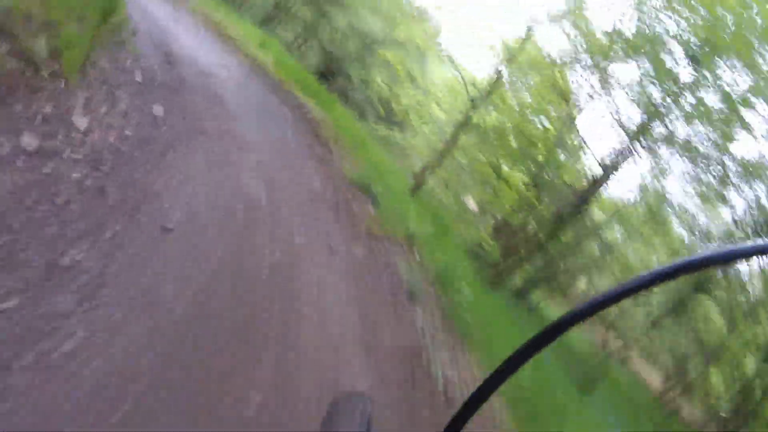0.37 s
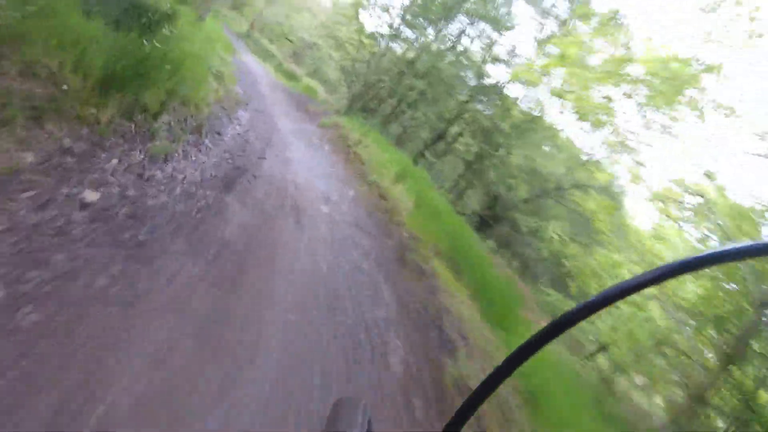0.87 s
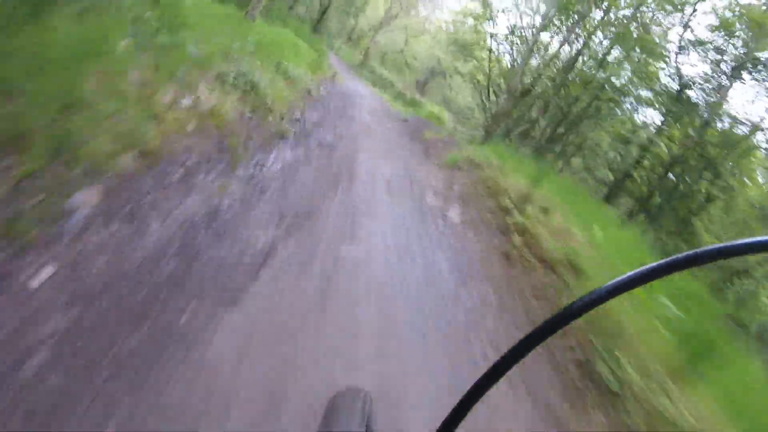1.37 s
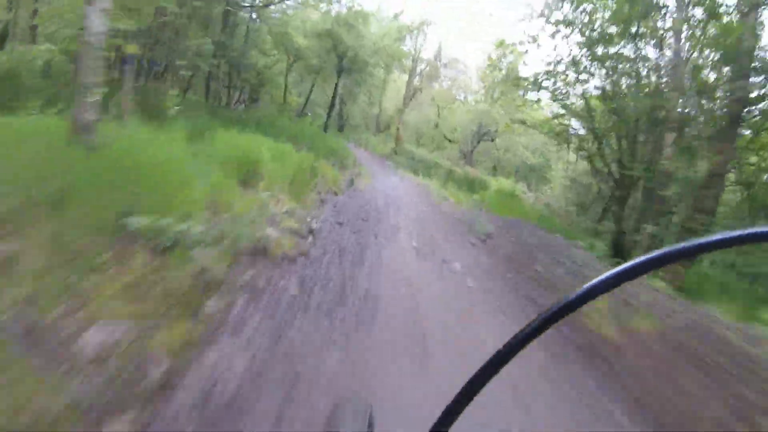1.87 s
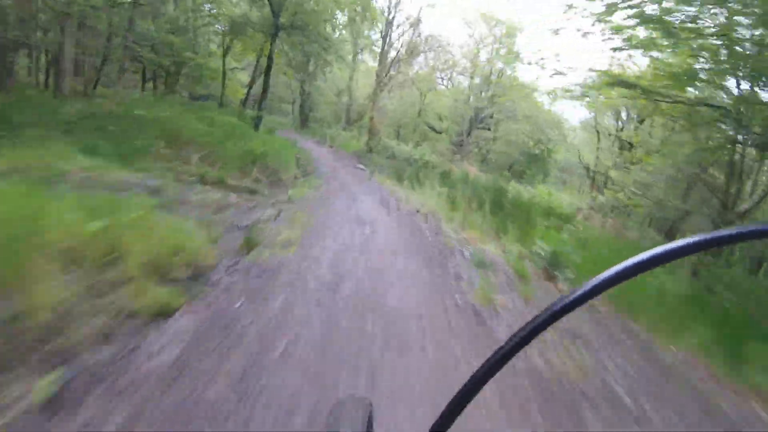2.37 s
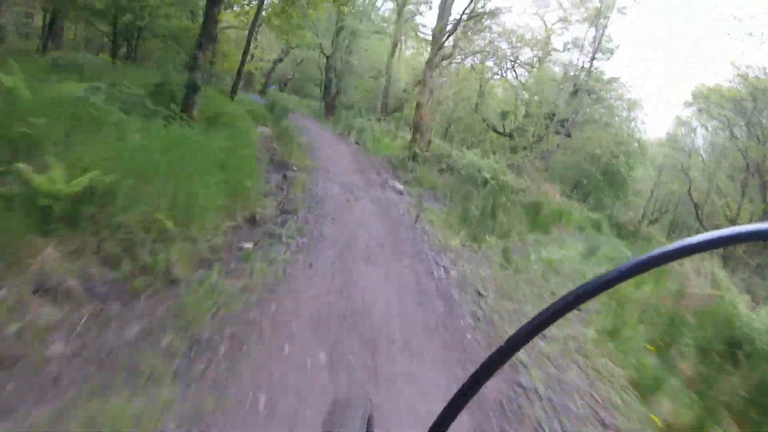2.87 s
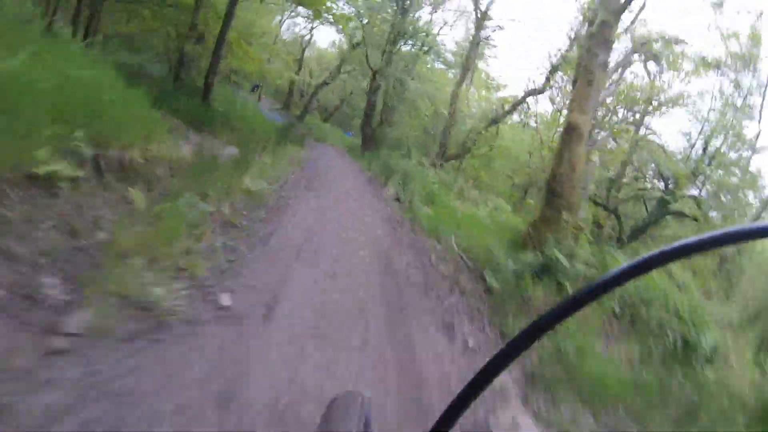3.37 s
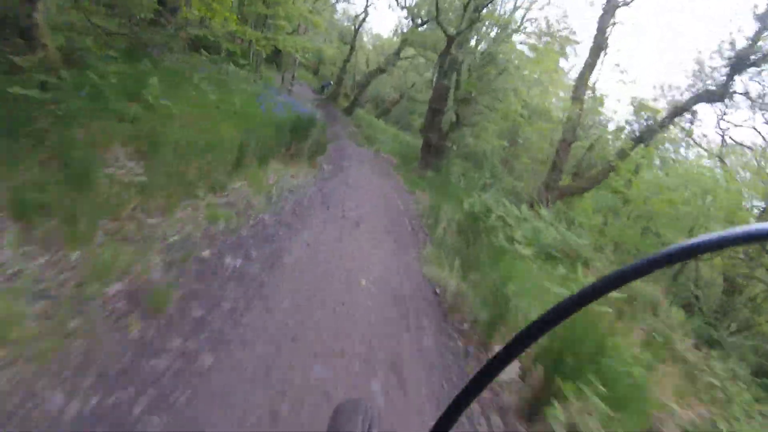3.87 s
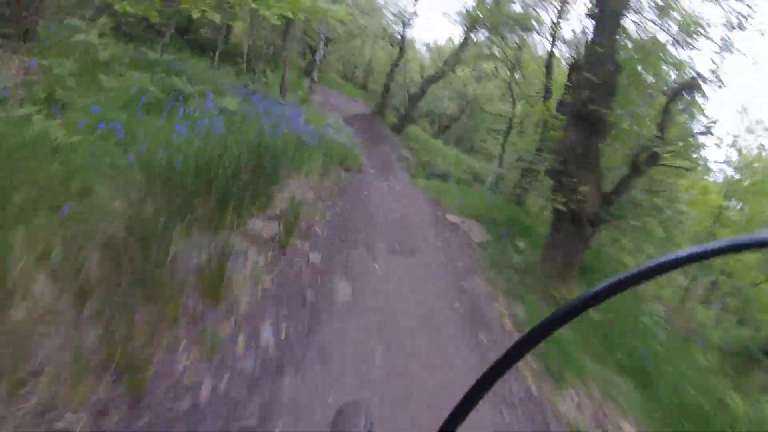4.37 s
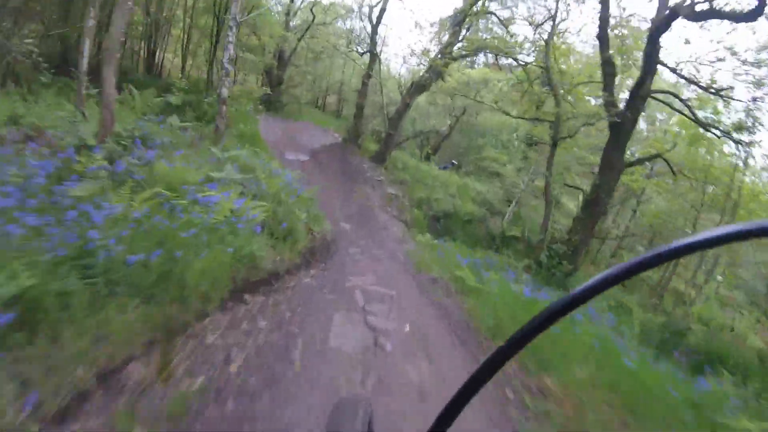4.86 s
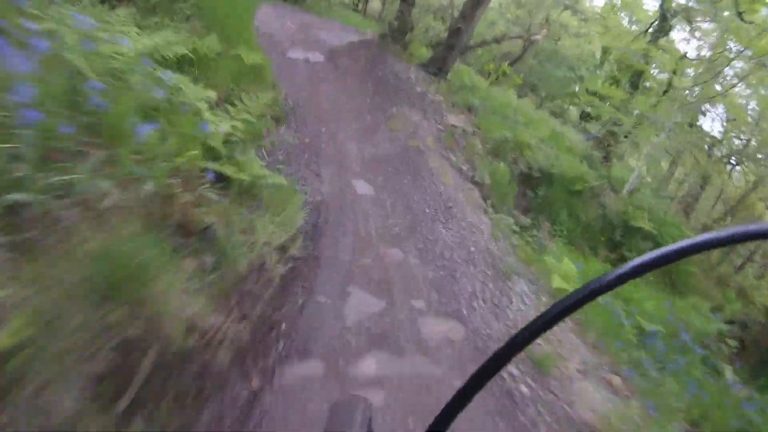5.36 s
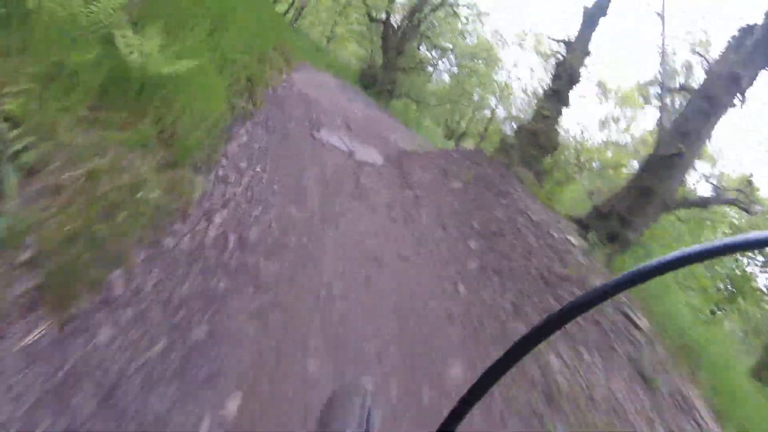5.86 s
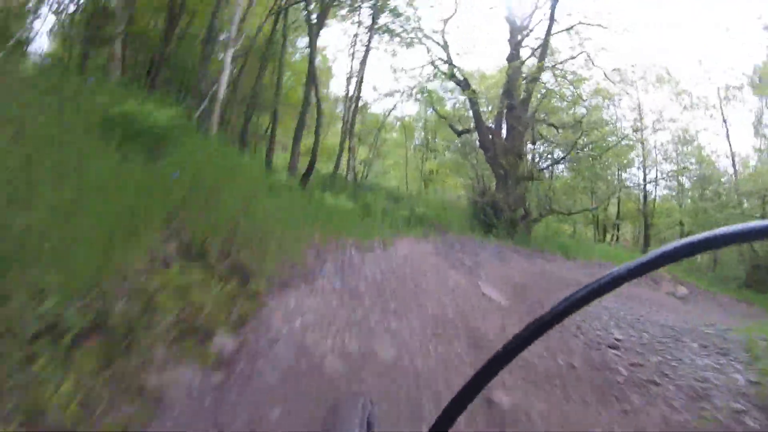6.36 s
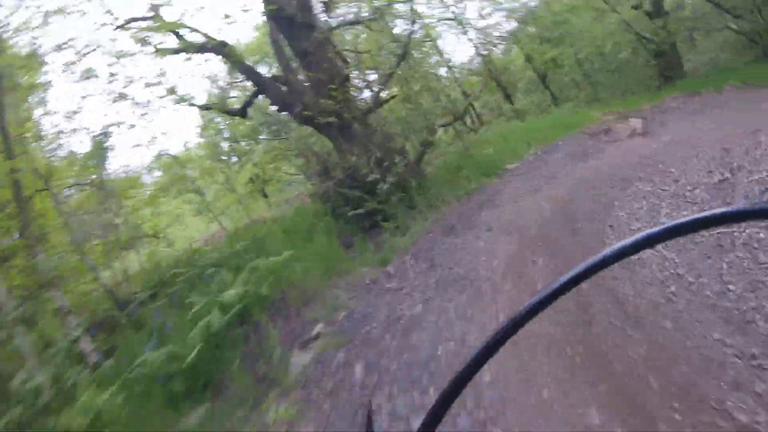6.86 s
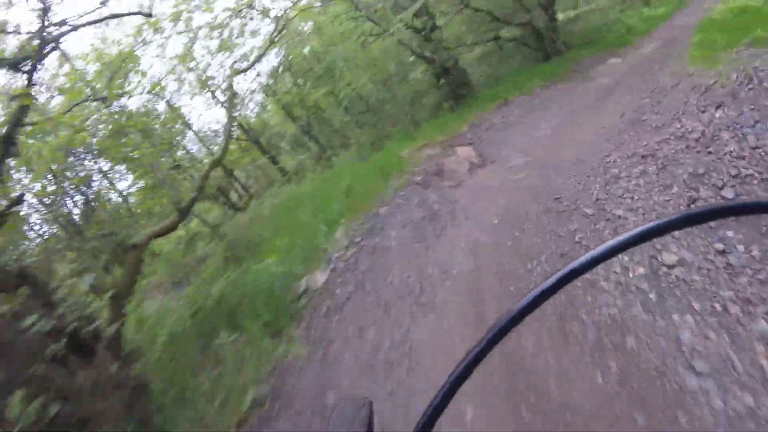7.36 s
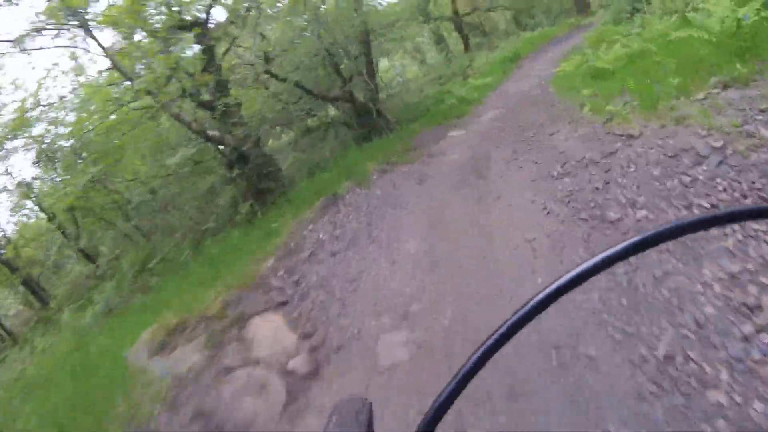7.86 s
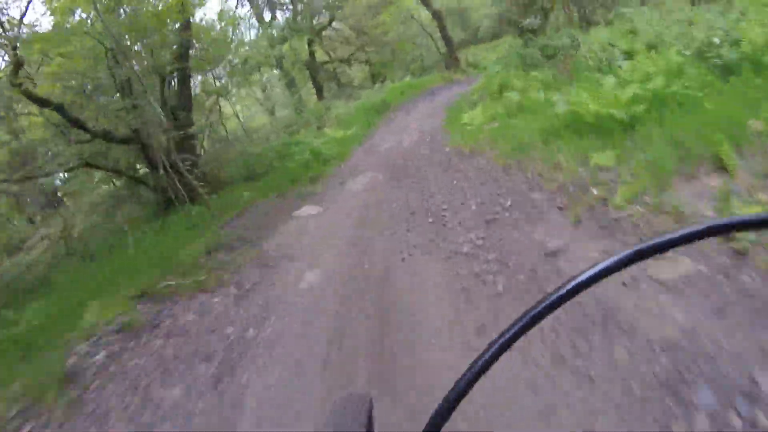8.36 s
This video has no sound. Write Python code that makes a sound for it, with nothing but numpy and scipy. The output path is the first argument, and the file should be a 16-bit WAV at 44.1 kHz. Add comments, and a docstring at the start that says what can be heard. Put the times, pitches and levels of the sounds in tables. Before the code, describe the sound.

A mountain bike rides fast down a gravel woodland trail, with a wavering low shudder, wind thumps, stony jolts and a loose part rattling.

```python
"""A gravel trail in a wood, ridden on a mountain bike that carries a camera in a closed housing.
The mount shudders as a wavering low tone plus resonant noise; wind thumps as low filtered noise.
Stones jolt the frame, a loose part rattles, the chain jingles and slaps, grit crunches and pings:
short contacts and noise driving banks of resonances. Air hisses through the housing's resonances.
Small birds sing faintly as gliding sines."""
import sys
import numpy as np
from scipy import signal
from scipy.io import wavfile
from scipy.ndimage import uniform_filter1d

SR = 44100
rng = np.random.default_rng(int(sys.argv[2]) if len(sys.argv) > 2 else 0)


def gain_from_db(level_db):
    """Turn a decibel level (scalar or array-like) into a linear amplitude factor."""
    decades = np.asarray(level_db, float) / 20
    return 10 ** decades


def master_out(mix):
    """Clip the mix to full scale and print it as 16-bit PCM to the path in sys.argv[1]."""
    frames = np.transpose(np.atleast_2d(mix))
    ceiling = np.clip(frames, -1, 1)
    pcm = np.round(ceiling * 32767).astype(np.int16)
    wavfile.write(sys.argv[1], SR, pcm)


N = 384993
TIME = np.arange(N) / SR

# swing of the mount: [start_s, relative_level_db]
MOUNT_SWING = [(0.0, -21), (0.73, -20), (0.77, -30), (0.97, -17), (1.21, -28.5), (1.58, -13.5), (1.63, -21),
               (2.62, -17.5), (7.02, -25), (7.21, -29), (7.48, -15.5), (7.7, -37), (7.77, -18),
               (8.48, -23.5), (8.55, -31.5), (8.67, -16.5), (8.72, -18)]
# ride as felt: [start_s, frame_rumble_relative_db, wind_thump_relative_db]
RIDE = [(0, -27, -28.5), (0.45, -31, -27.5), (1.3, -32, -30), (1.5, -27, -26.5), (2.05, -32.5, -31),
        (2.5, -26, -21), (2.9, -25.5, -22), (3.85, -28.5, -26.5), (4.12, -26, -19), (4.35, -27.5, -24),
        (5.15, -29, -25.5), (5.4, -27.5, -19), (5.78, -25.5, -18.5), (5.95, -30.5, -35), (6.45, -32, -25.5),
        (6.8, -28, -25), (7.12, -35, -29), (7.4, -33.5, -24.5), (7.9, -34, -27), (8.2, -26.5, -19),
        (8.56, -34.5, -29.5), (8.73, -25.5, -19.5)]
# stones jolting the frame: [start_s, peak_db]
JOLT_EVENTS = [(0.317, -16), (0.506, -17), (0.696, -23), (0.963, -13), (2.198, -17), (2.891, -13),
               (3.092, -18.5), (3.141, -14.5), (3.496, -19), (3.61, -22), (4.114, -11), (4.521, -16),
               (5.013, -23), (5.028, -17.5), (5.063, -12), (5.079, -19), (5.195, -15.5), (5.279, -13.5),
               (5.311, -19), (5.397, -16), (5.419, -12), (5.514, -18), (5.553, -18), (5.596, -11.5),
               (5.712, -13.5), (6.521, -17), (6.706, -19), (7.262, -14.5), (7.362, -15), (7.627, -10.5),
               (7.682, -20), (7.712, -16), (7.727, -15), (7.757, -20.5), (7.881, -17.5), (7.966, -16),
               (8.086, -21), (8.119, -12), (8.139, -13), (8.218, -13), (8.263, -12.5), (8.707, -16.5)]
# loose part knocking: [start_s, peak_db]
KNOCK_EVENTS = [(0.0287, -26), (0.0772, -33), (0.106, -31), (0.16, -23.5), (0.323, -21), (0.4075, -20.5),
                (0.4439, -21), (0.4846, -25), (0.5452, -32), (0.7446, -23), (0.7972, -31), (0.8435, -34),
                (1.0013, -26), (1.0518, -22.5), (1.1079, -25), (1.186, -26), (1.7822, -29), (1.8266, -34.5),
                (1.8475, -29), (1.8682, -24.5), (1.9109, -33.5), (2.6357, -35), (3.0473, -24),
                (3.0896, -30), (3.1782, -36), (3.2635, -20.5), (3.3178, -25.5), (3.3577, -36), (3.623, -25),
                (3.7977, -35), (4.0422, -27.5), (4.125, -22), (4.2502, -26.5), (4.2906, -30.5),
                (4.4727, -32), (4.5257, -26.5), (4.6105, -27), (4.6285, -21), (4.7289, -24.5),
                (4.8214, -28), (4.8735, -29), (4.9796, -31), (5.2246, -24), (5.4605, -29), (5.5152, -22),
                (5.5974, -23), (5.6294, -26.5), (5.7262, -25), (5.8524, -27), (6.0377, -42), (6.3789, -27),
                (6.4505, -35.5), (6.6146, -34), (6.687, -28.5), (6.9651, -26), (7.0384, -30), (7.203, -38),
                (7.2188, -35), (7.2362, -29), (7.2609, -35), (7.3275, -34), (7.3604, -35), (7.3894, -35),
                (7.4325, -34.5), (7.46, -32), (7.4905, -29.5), (7.6294, -35), (7.7965, -30),
                (7.8838, -28.5), (8.0895, -28.5), (8.326, -26), (8.3596, -35), (8.4238, -23),
                (8.4885, -30.5), (8.5565, -29)]
# quieter stretch of the loose part's rattle: [start_s, gain_db]
PART_GAIN = [(1.2, 1), (1.35, -3.5), (2.7, -3), (3.6, 0.5)]
# chain slapping: [start_s, peak_db]
SLAP_EVENTS = [(0.4686, -34.5), (0.74, -38.5), (0.9484, -34.5), (2.9887, -32), (3.028, -31),
               (3.3523, -28.5), (3.5587, -33), (3.91, -32), (4.226, -35), (4.2796, -31), (4.7555, -23),
               (4.9385, -26), (5.3113, -35.5), (5.594, -31.5), (5.6397, -29), (5.8057, -33),
               (6.2088, -35.5), (6.6736, -33), (7.629, -36), (8.2333, -30.5)]
# grit pinging off the housing: [start_s, peak_db]
PING_EVENTS = [(0.9463, -35), (2.4691, -28.5), (3.027, -43), (3.09, -41.5), (3.157, -41.5), (3.202, -36),
               (3.309, -36), (3.334, -37.5), (3.3504, -25.5), (4.1556, -38), (4.1652, -26), (5.3487, -35.5),
               (5.7337, -27), (5.8556, -34), (5.95, -31), (7.808, -41.5), (8.0704, -29), (8.099, -33.5),
               (8.141, -34)]
# tyres crunching through loose stones: [start_s, length_s, relative_level_db]
CRUNCH_EVENTS = [(0.107, 0.046, -42.5), (0.721, 0.03, -57.5), (2.984, 0.024, -44.5), (3.546, 0.064, -46),
                 (4.733, 0.021, -42), (4.872, 0.02, -46.5), (5.211, 0.023, -42.5), (5.393, 0.051, -49.5),
                 (4.906, 0.22, -55), (5.27, 0.029, -52), (5.58, 0.1, -46.5), (5.716, 0.2, -52),
                 (6.455, 0.11, -48), (7.624, 0.04, -53.5), (7.67, 0.11, -48), (8.094, 0.082, -49.5),
                 (8.223, 0.061, -49)]
# airflow hiss: [start_s, relative_level_db]
AIR_LEVEL = [(0.0, -53), (0.17, -67), (0.82, -62.5), (2.6, -50.5), (3.65, -59.5), (5.74, -60),
             (5.91, -60.5), (6.22, -64.5), (8.73, -58)]

# resonances of the frame: [centre_hz, width_hz, relative_level_db]
FRAME_MODES = [(153, 50, -5.5), (199.5, 21.6, 2), (297.7, 65.4, -0.5), (349.7, 45, 1.5), (468.6, 40.6, 4),
               (572.5, 95.6, 0), (645, 93, -1.5)]
# resonances of the loose part: [centre_hz, width_hz, relative_level_db]
PART_MODES = [(1255, 190, -12), (1440, 75, 5), (1620, 85, -1)]
# resonances of the tyre: [centre_hz, width_hz, relative_level_db]
TYRE_MODES = [(974, 400, 7.5), (2120, 550, -9.5)]
# resonances of the housing: [centre_hz, width_hz, relative_level_db]
HOUSING_MODES = [(2100, 250, -3), (2696, 210, 14.5), (3780, 400, -19), (5180, 1900, -5), (6560, 220, 4.5),
                 (7560, 700, -8), (9300, 1300, -39.5)]
# resonances of the chain: [centre_hz, width_hz, relative_level_db]
CHAIN_MODES = [(2343, 200, 3.5), (3720, 830, -13), (4920, 260, -4.5), (5670, 66, -4), (6404, 130, 3.5),
               (7040, 230, -8), (8300, 390, -35)]
# resonances of the housing's shell when pinged: [centre_hz, width_hz, relative_level_db]
SHELL_MODES = [(2920, 910, 10), (6500, 9600, -5.5), (11000, 1600, -30)]

# shapes of bird notes: (length_s, start_hz, end_hz, bend); bend under 1 glides early, over 1 late
SLUR, RISE, FALL = (.1, 5300, 4550, .4), (.048, 3750, 5300, 2.1), (.037, 5950, 4250, .75)
FLICK, DROOP, HIGH_FALL = (.04, 5150, 5900, 2.4), (.1, 7100, 6000, 6), (.04, 6200, 4500, .85)
# bird notes: [start_s, shape, relative_level_db]
BIRD_NOTES = [(.335, SLUR, -63), (.519, RISE, -60), (.654, RISE, -56), (.787, RISE, -59), (.923, RISE, -59),
              (1.035, DROOP, -72), (1.175, DROOP, -66), (1.3, DROOP, -71), (1.6, DROOP, -73),
              (1.75, DROOP, -71), (1.933, FALL, -56), (2.005, FLICK, -59), (2.114, HIGH_FALL, -54),
              (2.19, FLICK, -61), (2.31, FALL, -58), (7.82, DROOP, -69), (7.96, (.055, 5800, 4100, 1), -65)]

MOUNT_HZ, SAG_HZ_PER_DB, USUAL_SWING_DB = 88.34, 0.17, -22
USUAL_RUMBLE_DB, RATTLE_REF_DB, RATTLE_DB_PER_RUMBLE_DB = -29, -45, 1.46
TAP_BAND_HZ = (1200, 1800)


def curves(table):
    """Columns of a table joined by straight lines in time."""
    start_s, *columns = np.transpose(table)
    return [np.interp(TIME, start_s, column) for column in columns]


def unit(x):
    """Scale to rms 1."""
    return x / np.sqrt(np.mean(x ** 2))


def walk(rate_hz):
    """Random levels held 1 / rate_hz s, slewed twice; rms 1."""
    hold = int(SR / rate_hz)
    steps = np.repeat(rng.standard_normal(N // hold + 1), hold)
    slewed = uniform_filter1d(uniform_filter1d(steps, hold), hold)
    return unit(slewed[:N])


def ring(x, modes, soft_hz=None, notched=False):
    """Sum of two-pole resonances; a soft contact drives only below soft_hz, or inside it if a band."""
    if soft_hz:
        kind = "band" if np.ndim(soft_hz) else "low"
        x = signal.sosfilt(signal.butter(4, soft_hz, kind, fs=SR, output="sos"), x)
    out = 0
    for k, (hz, width_hz, db) in enumerate(modes):
        b, a = signal.iirpeak(hz, hz / width_hz, SR)
        # neighbours in phase leave notches between them; opposed ones fill the gaps
        sign = 1 if notched else (-1) ** k
        out = out + sign * gain_from_db(db) * signal.lfilter(b, a, x)
    return out


def shaken(modes, force, patchy_db, **body):
    """Modes driven by noise of the given strength with a patchy level; rms 1."""
    drive = force * gain_from_db(patchy_db * walk(14)) * rng.standard_normal(N)
    return unit(ring(drive, modes, **body))


def stones(per_s, spread_db, contact_ms, scatter=None):
    """Force of short unequal contacts, at random or, with scatter, at a loosely kept rate; rms 1."""
    hits = rng.random(N) < per_s / SR
    if scatter:
        gaps = SR / per_s * np.exp(scatter * rng.standard_normal(N // 100))
        hits = np.isin(np.arange(N), np.cumsum(gaps).astype(int))
    hits = hits * gain_from_db(spread_db * rng.exponential(size=N).clip(0, 3))
    decay = np.exp(-1000 / (contact_ms * SR))
    return unit(signal.lfilter([1], [1, -2 * decay, decay ** 2], hits))


def blows(events, modes, rise_ms, contact_ms, vary_db, strike=0.19, **body):
    """Each blow is a first strike of the given weight plus contact chatter that builds and dies."""
    size = 4096
    out, ms = np.zeros(N + size), np.arange(size) / SR * 1000
    push = (1 - np.exp(-ms / rise_ms)) ** 2 * np.exp(-ms / contact_ms)
    first = strike * np.sqrt(SR / 1000 * rise_ms) * (ms == 0)
    chance = rng.standard_normal((len(events), size + len(modes)))
    for (start_s, peak_db), noise in zip(events, chance):
        # each lands at its own spot, so the modes share it differently
        struck = [(hz, width_hz, db + vary_db * c) for (hz, width_hz, db), c in zip(modes, noise[size:])]
        sound = ring(noise[:size] * push + first, struck, **body)
        i = int(start_s * SR)
        out[i:i + size] += gain_from_db(peak_db) * sound / np.abs(sound).max()
    return out[:N]


def mount(level_db):
    """The mount swings at a wavering pitch, lower on wide swings; fresh kicks blur it."""
    hz = MOUNT_HZ - SAG_HZ_PER_DB * (level_db - USUAL_SWING_DB)
    phase = 2 * np.pi * np.cumsum(hz * (1 + 0.0521 * walk(25))) / SR
    swing = np.sqrt(2) * np.sin(phase)
    kicks = ring(rng.standard_normal(N), [(89.2, 25.0, 0)])
    kicks = unit(ring(kicks, [(81.7, 47.5, 0)]))
    buffeting = gain_from_db(level_db - 1.37 + 2.6 * walk(11))
    return buffeting * (swing * gain_from_db(1.3 * walk(18)) + 0.65 * kicks)


def wind(level_db):
    """Slow eddies thump the housing: noise through two low resonances."""
    thump = ring(rng.standard_normal(N), [(20.9, 12.8, -0.53), (57.2, 15.0, -0.17)])
    return gain_from_db(level_db + 2.0 * walk(13)) * unit(thump)


def frame_rumble(level_db, ground):
    """Stones and steady rolling drive the frame's modes through a soft contact."""
    return gain_from_db(level_db + 0.6 * walk(13)) * shaken(FRAME_MODES, ground + 1.18, 0.51, soft_hz=940)


def jolts():
    """Single stones strike the upper frame modes; each also shakes the loose part."""
    frame = blows(JOLT_EVENTS, FRAME_MODES[3:], 0.53, 6.9, 2.5, strike=1.8, soft_hz=970)
    part = blows(JOLT_EVENTS, PART_MODES, 0.84, 8.1, 7.2, soft_hz=1690, notched=True)
    return frame + gain_from_db(-16.5) * part


def loose_part(level_db, ground):
    """The stones that shake the frame scrape the loose part; it also bounces at a loosely kept rate."""
    level_db = level_db + curves(PART_GAIN)[0]
    scrape = shaken(PART_MODES, ground + 0.34, 1.2, soft_hz=1660, notched=True)
    taps = stones(per_s=42, spread_db=2.3, contact_ms=0.06, scatter=0.4) * gain_from_db(3.3 * walk(9))
    bounces = unit(ring(taps, PART_MODES, soft_hz=TAP_BAND_HZ, notched=True))
    return gain_from_db(level_db) * (0.4 * scrape + gain_from_db(-4.0) * bounces)


def knocks():
    """Single knocks ring the loose part; each also shakes the housing."""
    part = blows(KNOCK_EVENTS, PART_MODES, 0.71, 2.8, 3.7, strike=1.5, soft_hz=TAP_BAND_HZ, notched=True)
    housing = blows(KNOCK_EVENTS, HOUSING_MODES, 0.86, 6.0, 5.2)
    return part + gain_from_db(-20.5) * housing


def tyre_roll(level_db, ground):
    """Steady rolling and stones drive the tyre's modes."""
    return gain_from_db(level_db - 1.0) * shaken(TYRE_MODES, 0.5 * ground + 1, 2.44, soft_hz=2410)


def chain_jingle(level_db):
    """Random link contacts ring the chain, more on rougher ground."""
    contacts = stones(per_s=41, spread_db=2.2, contact_ms=1.2) + 0.13
    return gain_from_db(level_db - 17.0) * shaken(CHAIN_MODES, contacts, 3.4)


def chain_slaps():
    """The chain slaps: contact chatter without a first strike."""
    return blows(SLAP_EVENTS, CHAIN_MODES, rise_ms=1.5, contact_ms=1.8, vary_db=1.0, strike=0)


def grit_pings():
    """Grit meets the housing's shell in very short, hard contacts."""
    return blows(PING_EVENTS, SHELL_MODES, rise_ms=0.071, contact_ms=0.14, vary_db=6.0)


def crunches():
    """Bursts of dense grit that ring housing and chain."""
    strength = 0
    for start_s, length_s, db in CRUNCH_EVENTS:
        corners_s = start_s + length_s * np.array([0, 0.067, 0.7, 1])
        # the end values hold outside the burst as a faint trace
        strength = strength + gain_from_db(db) * np.interp(TIME, corners_s, [0.0098, 0.36, 0.35, 0.003])
    grit = stones(per_s=680, spread_db=3.5, contact_ms=1.0) + 0.4
    return strength * (shaken(HOUSING_MODES, grit, 3.2) + gain_from_db(4.0) * shaken(CHAIN_MODES, grit, 0.84))


def airflow(level_db):
    """Smooth air hiss, coloured by the housing."""
    return gain_from_db(level_db + 0.92 * walk(20)) * unit(ring(rng.standard_normal(N), HOUSING_MODES))


def birds():
    """Thin, slightly fluttering whistles that glide along a curved path, louder when high."""
    out = np.zeros(N)
    for start_s, (length_s, start_hz, end_hz, bend), db in BIRD_NOTES:
        u = np.linspace(0, 1, int(length_s * SR))
        pitch_hz = start_hz + (end_hz - start_hz) * u ** bend
        level = gain_from_db(db) * (pitch_hz / 5200) ** 2.5
        fade = np.sin(np.pi * u) ** 0.17
        whistle = np.sqrt(2) * np.sin(2 * np.pi * np.cumsum(pitch_hz) / SR)
        i = int(start_s * SR)
        out[i:i + len(u)] += level * fade * whistle
    return out * gain_from_db(2.2 * walk(300) - 3)


def scene():
    """Sum of all sources in mono; rumble sets the level of rattle, tyre and jingle."""
    rumble_db, wind_db = curves(RIDE)
    rattle_db = RATTLE_REF_DB + RATTLE_DB_PER_RUMBLE_DB * (rumble_db - USUAL_RUMBLE_DB)
    ground = stones(per_s=110, spread_db=1.0, contact_ms=1.93)
    mix = mount(*curves(MOUNT_SWING)) + wind(wind_db)
    mix += frame_rumble(rumble_db, ground) + jolts()
    mix += loose_part(rattle_db, ground) + knocks()
    mix += tyre_roll(rattle_db, ground)
    mix += chain_jingle(rattle_db) + chain_slaps()
    mix += grit_pings() + crunches()
    mix += airflow(*curves(AIR_LEVEL)) + birds()
    return mix[None]


def band_limit(x):
    """A steep low-pass at the top of the band."""
    return signal.sosfilt(signal.butter(12, 11440, fs=SR, output="sos"), x)


def record(dry):
    """The camera rounds the loudest peaks and dulls the top; the last few milliseconds fade out."""
    rounded = np.tanh(1.087 * dry) / 1.068
    dulled = signal.sosfilt(signal.butter(6, 10190, fs=SR, output="sos"), rounded)
    fade = np.clip((TIME[-1] - TIME) / 0.0041, 0, 1)
    return band_limit(dulled * fade)


dry = scene()
out = record(dry)
master_out(out)
```